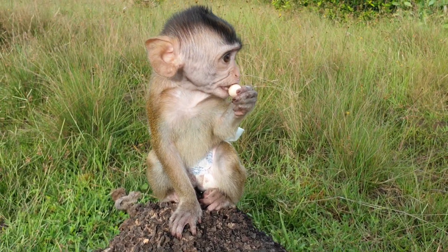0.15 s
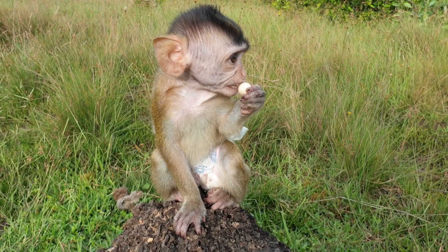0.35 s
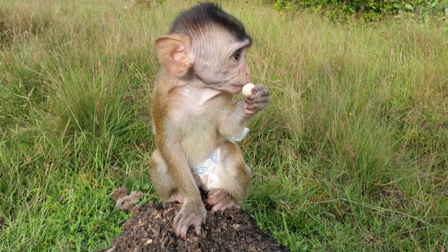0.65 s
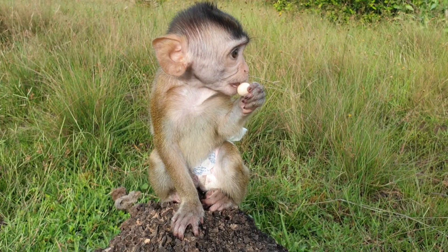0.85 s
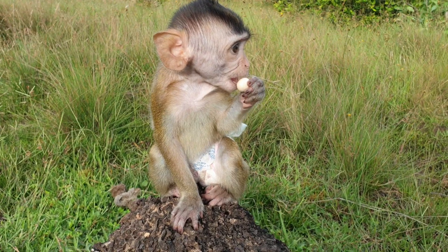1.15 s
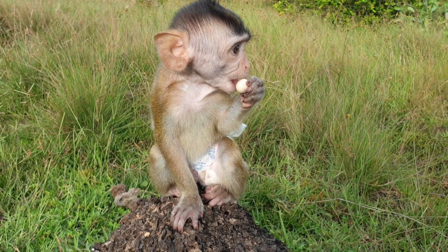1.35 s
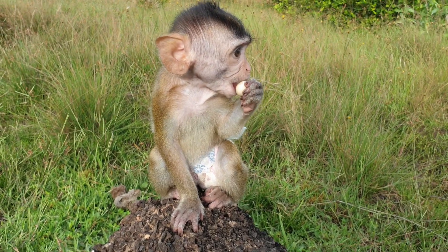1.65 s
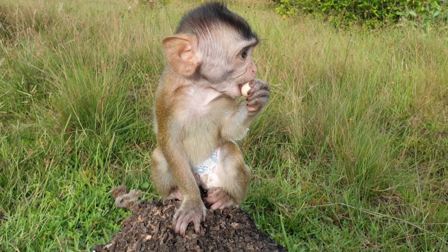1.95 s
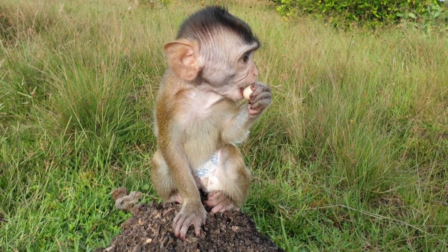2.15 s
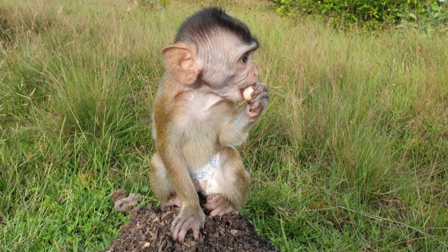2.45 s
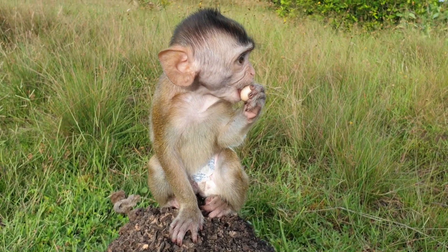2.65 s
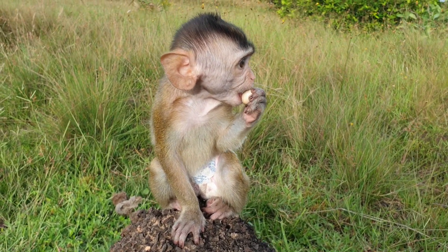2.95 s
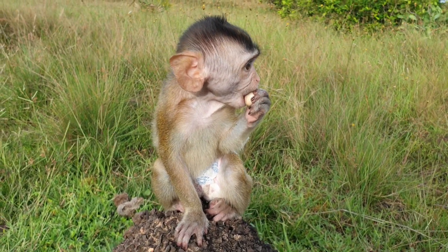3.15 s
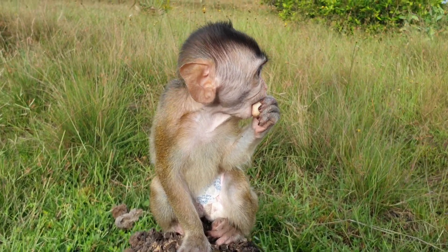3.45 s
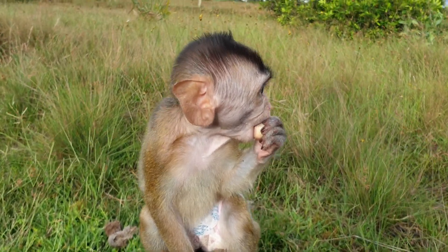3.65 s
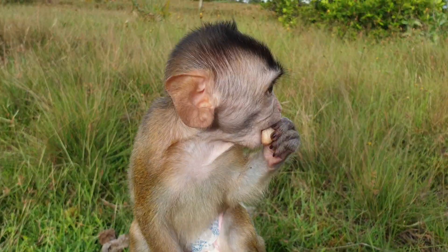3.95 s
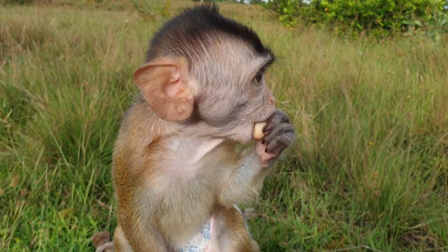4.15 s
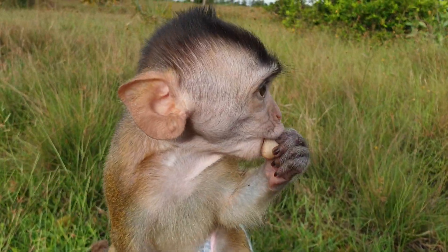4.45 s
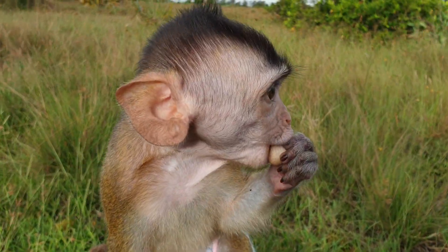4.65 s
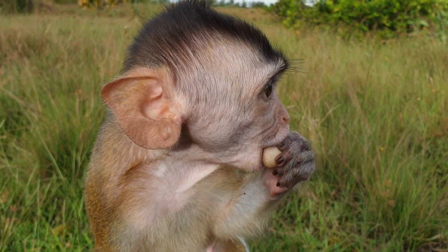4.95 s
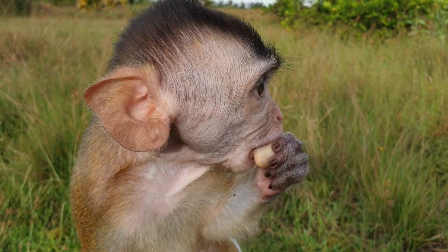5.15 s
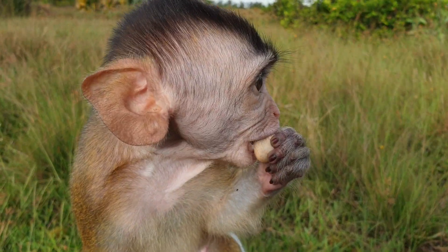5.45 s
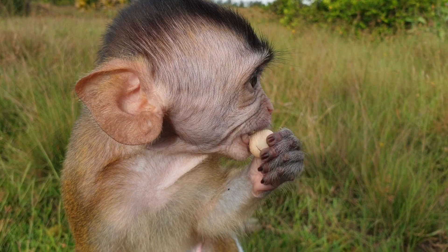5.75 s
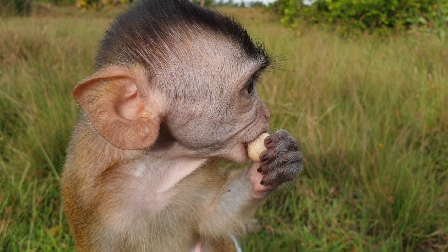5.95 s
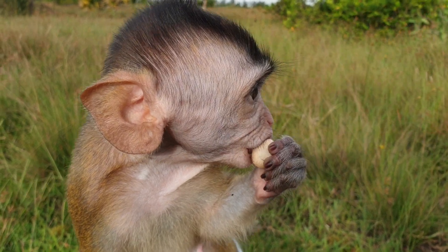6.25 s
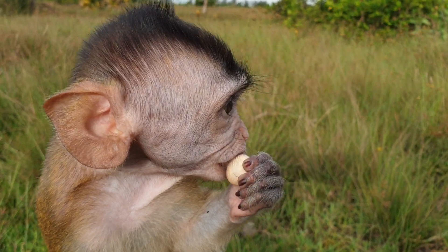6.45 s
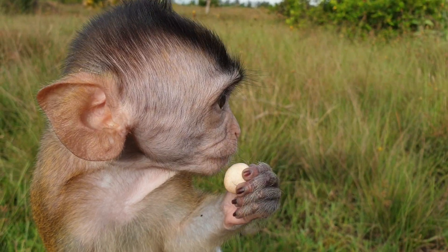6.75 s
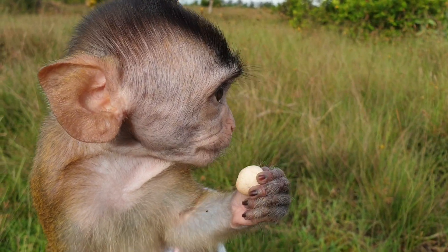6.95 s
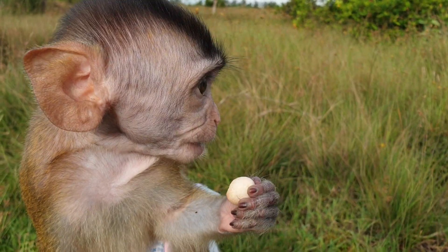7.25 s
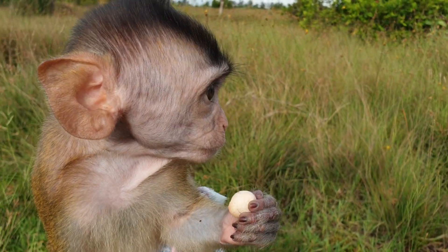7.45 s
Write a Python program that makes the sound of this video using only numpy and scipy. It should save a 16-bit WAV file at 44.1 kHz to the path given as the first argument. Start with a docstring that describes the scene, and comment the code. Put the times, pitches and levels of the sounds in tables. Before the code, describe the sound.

Low wind rumble hits both sides of an unsheltered microphone in lumps, with quiet insects far behind. A bird on the left begins with low drawn notes and builds into rapid hooks and buzzy trills, ending on two high falling whistles. Meanwhile small bites snap close by, and a young monkey calls four times, the first coo longest. Afterwards grass rustles lightly and the wind settles.

```python
"""An open field. From the start wind buffets both microphone ports over far hiss and an insect chorus.
A grasshopper buzzes briefly, far crickets come in, and a bird sings hooks, slurs, trills and whistles.
Later the grass rustles and biting makes small sharp clicks; then a young monkey gives four held coos.
Wind, insects and clicks are shaped noise; bird, monkey and crickets are sines on moving pitches."""
import sys
import numpy as np
from scipy import signal
from scipy.fft import rfft, irfft, next_fast_len
from scipy.io import wavfile
from scipy.ndimage import uniform_filter1d, map_coordinates

SR = 44100
rng = np.random.default_rng(int(sys.argv[2]) if len(sys.argv) > 2 else 0)


def to_wav(sig):
    """Store sig (one row per channel, or 1-D mono) as 16-bit WAV at the path in sys.argv[1].

    Samples outside -1..1 are clipped; the rate is SR.
    """
    pcm = np.clip(np.atleast_2d(sig), -1, 1) * 32767
    pcm = np.round(pcm).astype(np.int16)
    wavfile.write(sys.argv[1], SR, pcm.T)  # frames by channels


N = 335204  # length [samples]

# The bird's syllable shapes, which the song table names.
# Each: (time from the start [s], pitch before scaling [Hz], relative level [dB])
# a quick rise that hooks over and drops
HOOK = [(0, 3600, -9), (.004, 3850, -1), (.012, 4050, 0), (.015, 3850, -4), (.018, 3350, -20),
        (.023, 3000, -26)]
# a leap up and back, then a held low note
LOOP = [(0, 2930, -2), (.005, 3870, -3), (0.01, 5150, 3), (0.016, 4200, -4), (0.02, 3060, 3),
        (0.026, 2720, 12), (.06, 2680, 9), (0.067, 2740, -6)]
# a falling start, then the foot on which the flicks ride
TRILL = [(0, 3750, -22), (.028, 3650, -19), (.034, 3560, -1), (.044, 3400, 2), (.052, 2950, 0),
         (.166, 2860, 0), (.173, 2900, -18)]
# a high leap, then a long fall
WHISTLE = [(0, 3180, -13.5), (.004, 3840, 1), (.011, 5675, 0), (.045, 5490, 2), (0.051, 4060, 1.5),
           (0.088, 3247, 4.5), (.12, 3060, 5.5), (0.188, 2925, 2.5), (0.204, 3270, -30)]
# a slide down that flattens out
SLUR = [(0, 4030, -5), (.005, 3450, -3), (0.024, 2890, 2), (.06, 2630, 2), (0.092, 2520, -2),
        (.11, 2520, -17), (.13, 2510, -5), (.16, 2530, -8), (.18, 2480, -19)]
# a very short falling note
PIP = [(0, 4010, -9), (.007, 3323, 3), (0.031, 3250, -1), (0.039, 3460, -14)]
# a quick drop into a slowly sinking note
DRAWL = [(0, 3560, -14), (.012, 3000, -18), (0.031, 2750, -1.5), (0.151, 2560, -0.5), (.17, 2540, -14),
         (.19, 2700, -16)]


def amp(db):
    """Gain of a level in dB."""
    return 10 ** (np.asarray(db) / 20)


def unit(x):
    """x at rms 1."""
    return x / np.sqrt(np.mean(x ** 2) + 1e-20)


def curves(rows, t):
    """One interpolated curve over t for each column after the first."""
    s, *cols = np.transpose(rows)
    return [np.interp(t, s, c) for c in cols]


def wobble(rate, size=N):
    """A smooth random control curve with rate knots a second."""
    knots = rng.standard_normal(int(size * rate / SR) + 4)
    return map_coordinates(knots, [np.arange(size) * rate / SR])


def ramp(t, start, end, rise, fall):
    """An envelope: 0 outside start..end, straight edges, at most 1 inside."""
    return np.clip(np.minimum((t - start) / rise, (end - t) / fall), 0, 1)


def coloured(x, points):
    """x filtered through (frequency [Hz], gain [dB]) points on a log axis, closed at both ends."""
    m = next_fast_len(x.shape[-1] + 8192)
    f, db = np.transpose(points)
    log_hz = np.log(np.fft.rfftfreq(m, 1 / SR) + 1)
    gain = amp(np.interp(log_hz, np.log(f + 1), db, -120, -120))
    return irfft(rfft(x, m) * gain, m)[..., :x.shape[-1]]


def noise(points):
    """Unrelated coloured noise of rms 1 on both ports."""
    return unit(coloured(rng.standard_normal((2, N)), points))


def burst(size, points):
    """A short run of coloured noise at rms 1, on one channel."""
    return unit(coloured(rng.standard_normal(size), points))


def add(track, s, sound):
    """Mix a sound into a track from time s."""
    part = track[round(s * SR):][:len(sound)]
    part += sound[:len(part)]


def wind():
    """Eddies hit each port in lumps; the flutter rides on the same lumps. Single bumps land on top."""
    # steady wind: (time [s], thud level [dB], flutter level [dB])
    steady = [(0, -36, -55.5), (.55, -44.5, -54), (.67, -51, -59.5), (.9, -37.5, -53), (1.03, -47, -56.5),
              (1.3, -40.5, -52), (1.7, -38.5, -52.5), (2.3, -44, -51), (2.8, -38, -49.5),
              (3.42, -41.5, -49.5), (3.94, -29, -35.5), (4.32, -37, -47.5), (4.95, -36, -39.5),
              (5.17, -32.5, -39), (5.32, -28, -31.5), (5.82, -42, -51.5), (6.4, -40, -50.5),
              (7.6, -47, -54)]
    # single bumps, before the lumps: (time [s], half width [s], thud level [dB], flutter level [dB])
    gusts = [(0.301, 0.059, -29.5, -54.5), (0.419, 0.038, -28.5, -59), (1.128, 0.04, -27, -50),
             (1.549, 0.014, -31, -30), (1.6, 0.056, -28, -47.5), (2.461, 0.13, -26, -42),
             (3.723, 0.017, -23.5, -45), (4.114, 0.019, -19.5, -58), (4.232, 0.056, -24, -36),
             (4.469, 0.13, -28.5, -31.5), (5.02, 0.044, -30, -62), (5.226, 0.014, -30, -23),
             (5.449, 0.1, -27.5, -33.5), (5.698, 0.052, -23, -38.5), (6.733, 0.058, -30, -41.5)]
    # colour of the low thud: (frequency [Hz], density [dB per Hz])
    thud_colour = [(12, -65), (22, -16.5), (65, 2), (170, -12.5), (320, -39.5)]
    # colour of the quicker flutter: (frequency [Hz], density [dB per Hz])
    flutter_colour = [(90, -12), (170, -1), (300, -1), (500, -13.5), (800, -30.5), (1500, -41.5)]
    t = np.arange(N) / SR
    lumps = np.tanh([wobble(20), wobble(16)])  # the strongest eddies level off
    quick = np.array([wobble(45), wobble(45)])
    thud = unit(amp(7.1 * lumps) * noise(thud_colour))
    flutter = unit(amp(5.96 * lumps + 5.5 * quick) * noise(flutter_colour))
    thud_db, flutter_db = curves(steady, t)
    low, fast = sum(amp(dbs)[:, None] * ramp(t, s - half, s + half, half, half)
                    for s, half, *dbs in gusts)
    bumps = amp(2.7 * lumps) * (low * noise(thud_colour) + fast * noise(flutter_colour))
    return amp(thud_db) * thud + amp(flutter_db) * flutter + bumps


def background():
    """Far hiss, a high insect chorus and a dull far drone: bands of gently wavering noise."""
    # steady far hiss: (frequency [Hz], density [dB per Hz])
    hiss_colour = [(600, -3), (1400, 0), (2800, -4), (6000, -8), (7700, -7.5), (9300, -15.5), (12500, -16),
                   (15900, -19)]
    # level of the hiss, which the chorus follows lower down: (time [s], level [dB])
    hiss_levels = [(0, -71.5), (1.0, -71.5), (2.2, -68.5), (3.4, -67), (5, -69), (7.6, -70.5)]
    # narrow high insect band: (frequency [Hz], density [dB per Hz])
    chorus_colour = [(10200, -14), (10800, 0), (11500, 0), (12000, -14)]
    # a dull far drone that swells: (time [s], level [dB])
    drone_levels = [(0, -79), (1.3, -73), (1.7, -64), (2.6, -66.5), (3.5, -67), (7.6, -75.5)]
    drone_colour = [(400, -4.5), (800, 8.5), (1300, -1.5), (2200, -1)]
    t = np.arange(N) / SR
    hiss_db, drone_db = curves(hiss_levels, t)[0], curves(drone_levels, t)[0]
    hiss = amp(hiss_db + .6 * wobble(5)) * noise(hiss_colour)
    drone = amp(drone_db + .8 * wobble(14)) * noise(drone_colour)
    chorus = amp(hiss_db - 8.5 + .7 * wobble(1.5)) * noise(chorus_colour)
    return hiss + drone + chorus


def grasshopper():
    """A few short buzzes of narrow high noise that swell and stop quickly."""
    # (time [s], length [s], level [dB])
    buzzes = [(0.2, 0.16, -64.5), (5.501, 0.14, -64), (5.783, .16, -67.5)]
    t = np.arange(N) / SR
    level = sum(amp(db) * ramp(t, s, s + length, .041, .0082) for s, length, db in buzzes)
    return level * noise([(6800, -18), (7600, -1), (8400, -36)])


def crickets():
    """Faint far crickets: sines whose pitch wavers and whose level pulses irregularly."""
    # (pitch [Hz], start [s], end [s], middle level of the sine's peak [dB])
    calls = [(2530, 0.94, 3.66, -78), (2347, 1.88, 3.43, -75), (2350, 3.5, 6, -77)]
    t, sound = np.arange(N) / SR, np.zeros(N)
    for hz, start, end, db in calls:
        waver = 1 + .003 * wobble(3) + .007 * wobble(60)
        level = ramp(t, start, end, .35, .47) * amp(db + 5 * np.tanh(wobble(12)))
        sound += level * np.sin(2 * np.pi * np.cumsum(hz * waver) / SR)
    return sound


def bird():
    """A breathy sine with weak overtones; in a trill the pitch flicks up and the level dips at each flick."""
    # the song: (time [s], syllable shape, level [dB], pitch factor, stretch factor)
    song = [(1.335, DRAWL, -54.5, 1.01, 1.03), (1.685, SLUR, -50.5, 0.98, 1.14),
            (2.009, HOOK, -58.5, 1.075, 1.2), (2.032, PIP, -47.5, 1.006, 1.17),
            (2.103, HOOK, -50.5, 0.91, 1.03), (2.12, PIP, -46.5, 0.92, 1.1), (2.16, PIP, -43.5, 0.83, 0.63),
            (2.183, PIP, -64.5, 1.24, 1.3), (2.349, HOOK, -48, 1.03, 0.86), (2.366, TRILL, -45, .96, 1.02),
            (2.634, HOOK, -42, 0.96, 1.53), (2.661, LOOP, -51.5, 1.01, 0.92),
            (2.811, HOOK, -48.5, 1.03, 1.1), (2.836, TRILL, -45, .97, .9), (3.079, HOOK, -43, 0.98, 1.73),
            (3.109, LOOP, -51.5, 0.986, 0.97), (3.264, HOOK, -53, 1.07, 1.7), (3.281, TRILL, -51, .98, .98),
            (3.532, HOOK, -38.5, 1.01, 1.77), (3.558, LOOP, -48.5, 1, 0.91), (3.703, HOOK, -43, 1.033, 1.6),
            (3.727, TRILL, -42, 1.0, 1.0), (3.976, WHISTLE, -48, 0.96, 1.13),
            (4.312, WHISTLE, -44.5, 0.97, 0.98)]
    # overtones, by multiple of the pitch: (overtone frequency [Hz], level against the tone [dB])
    beak = {2: [(5200, -29), (6200, -27), (7500, -14), (10000, -18), (11500, -26)], 3: [(7500, -26),
            (9100, -21), (10200, -28), (13000, -30)]}
    # air under the tone: (frequency [Hz], density [dB per Hz])
    breath_colour = [(2000, -20), (5000, -3), (9000, 0), (11000, -10), (15700, -15)]
    breath_db, loud_db, breath_grows = -26, -45, .7  # softer syllables carry less air
    rough_db = -8  # noise hugging a trill
    held_above, held_db, held_third_db = 1.08, -3, -16  # factor over the foot of the trill, levels
    nasal_db = 15  # the drawl has a stronger second harmonic
    track = np.zeros(N)
    for s, shape, db, pitch, stretch in song:
        t = np.arange(0, shape[-1][0] * stretch, 1 / SR)
        size = len(t)
        hz, level_db = (uniform_filter1d(c, size=90) for c in curves(shape, t / stretch))

        # flicks, only inside a trill, shallower towards its end
        depth = .5 * ramp(t / stretch, .04, .155, .012, .02) * (1.15 - 2.5 * t) * (shape is TRILL)
        beat = 2 * np.pi * 82.5 * (t - .048 * stretch)  # 82.5 flicks a second
        flick = depth * (.5 + .5 * np.cos(beat)) ** 2.4
        fall_db = 9 * depth * np.sin(beat)  # each downward sweep is the stronger
        hz = pitch * hz * (1 + flick)
        turn = 2 * np.pi * np.cumsum(hz) / SR

        tone = np.sin(turn)
        for k, colour in beak.items():
            nasal = nasal_db * (shape is DRAWL and k == 2)
            overtone_db = curves(colour, k * hz)[0] + nasal + 3 * wobble(300, size)
            tone += amp(overtone_db) * np.sin(k * turn)
        tone += amp(breath_db + breath_grows * (db - loud_db)) * burst(size, breath_colour)
        tone += amp(rough_db) * np.sqrt(2 * np.abs(depth)) * wobble(895, size) * np.sin(turn)

        # the other side of the throat holds a rough note just over the foot of the trill
        held_hz = held_above * hz / (1 + flick) * (1 + .025 * wobble(250, size))
        held = 2 * np.pi * np.cumsum(held_hz) / SR
        held_gain = 2 * depth * amp(held_db + 20 * flick + 3 * wobble(400, size))
        tone += held_gain * (np.sin(held) + amp(held_third_db) * np.sin(3 * held))

        shimmer_db = 2 * wobble(200, size)
        level = amp(db + level_db - 26 * flick + fall_db + shimmer_db)
        add(track, s, np.sqrt(2) * ramp(t, 0, t[-1], .002, .002) * level * tone)
    return track


def rustles():
    """Grass rustling: noise with a fast crackling level that swells and falls away."""
    # (peak time [s], rise [s], fall [s], level before the crackle [dB])
    swells = [(3.44, 0.19, 0.16, -61.5), (6.27, 0.32, 0.2, -55), (6.651, 0.31, 0.23, -56.5),
              (7.02, 0.21, 0.19, -65.5)]
    # (frequency [Hz], density [dB per Hz])
    grass_colour = [(600, -14), (1200, -4.5), (5000, -8), (8000, -7), (15700, -10.5)]
    t = np.arange(N) / SR
    level = sum(amp(db) * ramp(t, s - up, s + down, up, down) ** .98 for s, up, down, db in swells)
    crackle = amp(1.8 * wobble(45) + 2.87 * np.abs(wobble(300)))
    return level * crackle * noise(grass_colour)


def bites():
    """Each bite is a burst of noise a few milliseconds long: a bright snap or a duller knock."""
    # sharp bites: (time [s], noise level before attack and decay [dB])
    snaps = [(3.3892, -33.5), (3.3974, -39), (3.4074, -41), (3.4176, -39), (3.4436, -43), (3.4865, -38.5),
             (3.5089, -41), (4.0372, -28.5), (4.0514, -40), (4.0584, -32), (4.0682, -34.5), (4.1071, -27),
             (4.1535, -35), (5.2689, -48), (5.7793, -47.5), (5.9254, -39), (6.5031, -47), (6.6563, -43)]
    # (frequency [Hz], density [dB per Hz])
    snap_colour = [(2500, -22), (4200, 5), (5000, 9.5), (8000, 2.5), (10500, -3), (16000, -13)]
    # duller bites: (time [s], noise level before attack and decay [dB])
    knocks = [(4.3096, -26.5), (4.9982, -34)]
    # (frequency [Hz], density [dB per Hz])
    knock_colour = [(500, -47), (1100, -4.5), (2200, -10.5), (4000, -35)]
    attack_s = .0008
    track, t = np.zeros(N), np.arange(SR // 30) / SR
    attack = np.sin(np.pi / 2 * np.clip(t / attack_s, 0, 1)) ** 2
    # t60: time to fall by 60 dB [s]
    for rows, colour, t60 in ((snaps, snap_colour, .009), (knocks, knock_colour, .02)):
        for s, db in rows:
            add(track, s, amp(db - 60 * t / t60) * attack * burst(len(t), colour))
    return track


def monkey():
    """Clear harmonics on one pitch; uneven alternate cycles add lines halfway and a rasp."""
    # four coos: (time [s], pitch [Hz], first harmonic's level [dB],
    # mouth opening as second harmonic over the first [dB])
    coos = [
        [(4.055, 895, -47.5, -19), (4.197, 980, -31, -28), (4.371, 1027, -31.5, -0.5), (4.557, 1068, -35, -4),
         (4.685, 1076, -35, -14), (4.71, 1040, -39, -17)],
        [(4.89, 990, -40, -19), (4.916, 1003, -37, -6), (5.004, 1026, -35.5, -1), (5.088, 1037, -37.5, -7.5),
         (5.115, 1015, -40.5, -11)],
        [(5.28, 987, -39, -18), (5.304, 1013, -35.5, -10), (5.38, 1062, -31.5, -7.5), (5.496, 1091, -33, -8.5),
         (5.524, 1071, -33.5, -10), (5.555, 1046, -40, -18)],
        [(5.855, 1049, -38, -34), (5.887, 1081, -34, -24.5), (6.001, 1024, -33, -14),
         (6.157, 1040, -31.5, -6.5), (6.257, 1047, -34, -3), (6.305, 1056, -37, -12.5)],
    ]
    # upper harmonics: (multiple of the pitch, relative level [dB])
    upper = [(4, 3), (5, -1), (6, -7), (7, -2), (8, -2), (9, 1), (10, 1), (11, -9)]
    # lines halfway between harmonics: (multiple of the pitch, relative level [dB])
    halves = [(1.5, -1.2), (2.5, 1)]
    # stretches of uneven cycles: (time [s], length [s], level [dB])
    doubling = [(4.448, 0.147, -55), (4.617, 0.13, -65), (5.025, 0.086, -58), (5.417, 0.13, -59),
                (6.254, 0.045, -52.5)]
    rasp_colour = [(600, -23.5), (1500, -15), (2800, -18), (6000, -26), (9500, -19), (11800, -26)]
    attack_s, release_s = .01, .03
    sag_hz, fade_db, close_db = 105, 13, 1  # a coo's end sags, fades and shuts the second harmonic
    third_under_db = -16  # third harmonic against the second
    closing_db, closing_s = -44, .026  # flash of the third while the mouth shuts
    track = np.zeros(N)
    for rows in coos:
        t = np.arange(rows[0][0] - attack_s, rows[-1][0] + release_s, 1 / SR)
        size = len(t)
        hz, first_db, open_db = (uniform_filter1d(c, size=300, mode="nearest")
                                 for c in curves(rows, t))
        end = np.clip((t - rows[-1][0]) / release_s, 0, 1) ** 1.8
        hz, first_db = hz - sag_hz * end, first_db - fade_db * end
        second_db = first_db + open_db - close_db * end
        flash = ramp(t, t[-1] - 2 * closing_s, t[-1], closing_s * 1.43, closing_s * .61)
        third_db = 20 * np.log10(amp(second_db + third_under_db) + amp(closing_db) * flash)
        turn = 2 * np.pi * np.cumsum(hz * (1 + .0012 * wobble(60, size))) / SR

        def line(k, db, sway_db):
            """A swaying sine at k times the pitch, from a random phase."""
            sway = sway_db * wobble(22.8, size)
            return amp(db + sway) * np.sin(k * turn + rng.uniform(0, 2 * np.pi))

        voice = line(1, first_db, .65) + line(2, second_db, .99) + line(3, third_db, 3.6)
        upper_db = .66 * first_db + .32 * second_db - 24.5 - 20 * end  # more effort, richer harmonics
        for k, db in upper:
            drift_db = 7 * np.tanh(wobble(6, size)) + 2.5 * wobble(200, size)
            voice += line(k, upper_db + db + drift_db, 2.5)
        uneven = sum(amp(db) * ramp(t, s, s + length, .015, .015) for s, length, db in doubling)
        voice += uneven * amp(5 * wobble(70, size)) * sum(line(k, db, 1) for k, db in halves)
        rasp = burst(size, rasp_colour) * (1 + np.sin(turn))  # swells once a cycle
        voice += (amp(second_db - 26) + amp(-4) * uneven) * rasp
        add(track, t[0], np.sqrt(2) * ramp(t, t[0], t[-1], attack_s, .0043) ** 2 * voice)
    return track


def echoes(x):
    """Scattered answers from grass and bushes: a decaying noise tail, different on each side."""
    t = np.arange(SR // 5) / SR
    tail = rng.standard_normal((2, len(t))) * amp(-60 * t / .26)  # falls 60 dB per 0.26 s
    return signal.fftconvolve(x[None], tail / np.linalg.norm(tail[0]), axes=1)[:, :N]


def placed(x, count, pan_db):
    """The sound reaches the right port count samples late; pan_db is left level over right."""
    return np.array([x * amp(pan_db / 2), np.roll(x, count) * amp(-pan_db / 2)])


def scene():
    """By arrival time the bird sits well to the left, the monkey near the middle, the bites in it."""
    song, clicks, coo = bird(), bites(), monkey()
    near = placed(song, count=10, pan_db=-1) + clicks + placed(coo, count=2, pan_db=-1.8)
    far = echoes(amp(-15) * song + amp(-10) * clicks + amp(-26) * coo)
    field = background() + grasshopper() + crickets() + rustles()
    return wind() + field + near + far


def record(dry):
    """A level passband that closes above its limit of 15850 Hz."""
    return coloured(dry, [(0, 0), (15850, 0)])


dry = scene()
out = record(dry)
to_wav(out)
```